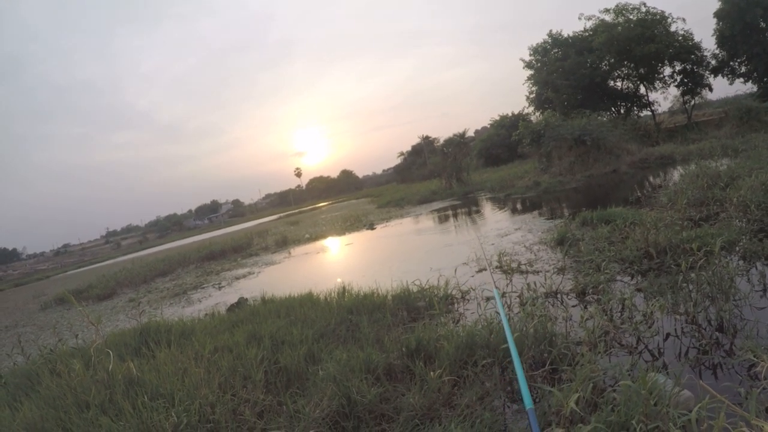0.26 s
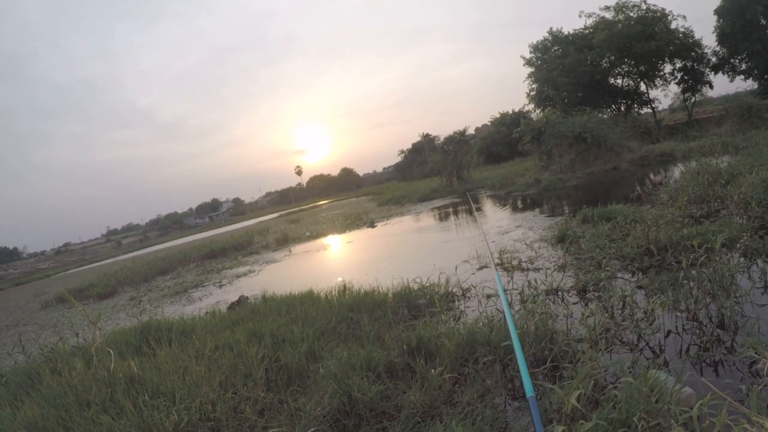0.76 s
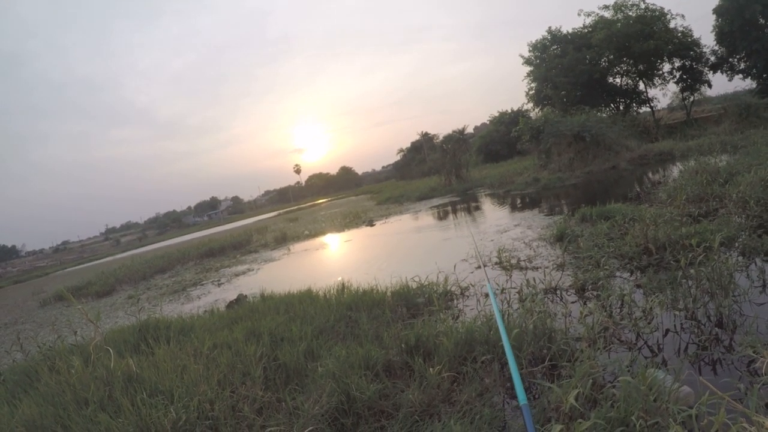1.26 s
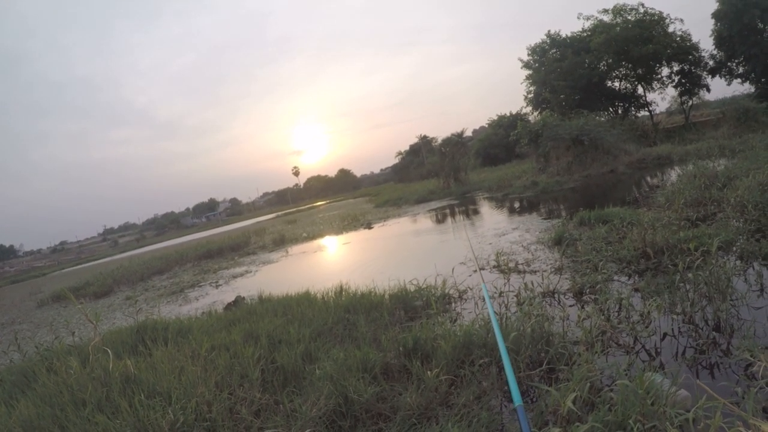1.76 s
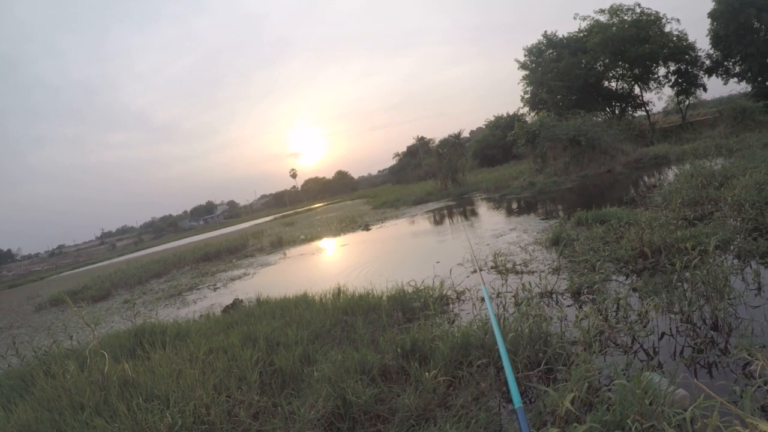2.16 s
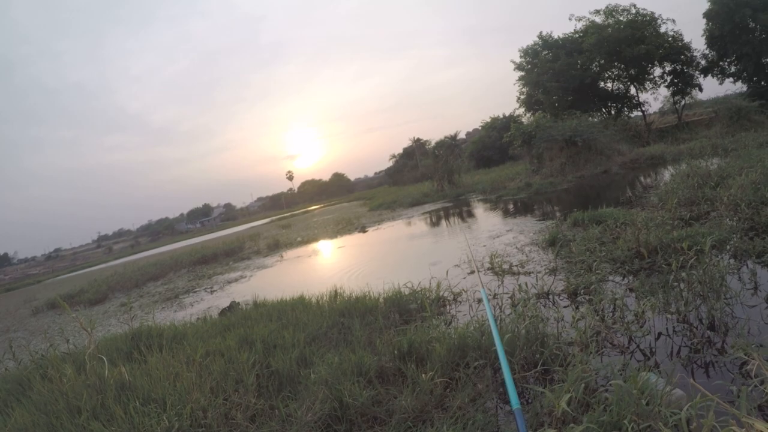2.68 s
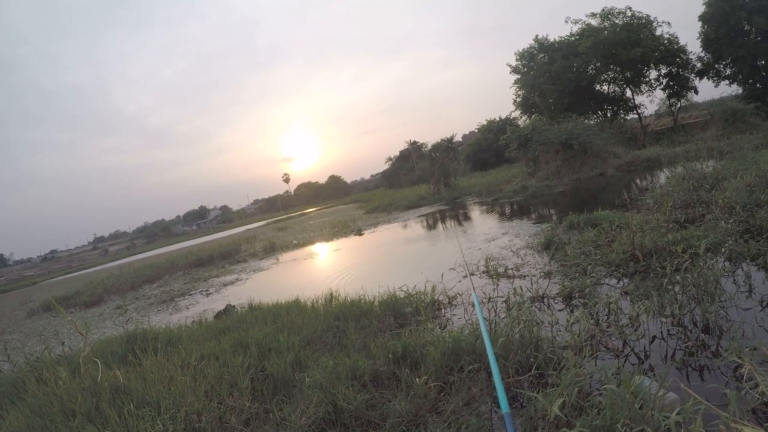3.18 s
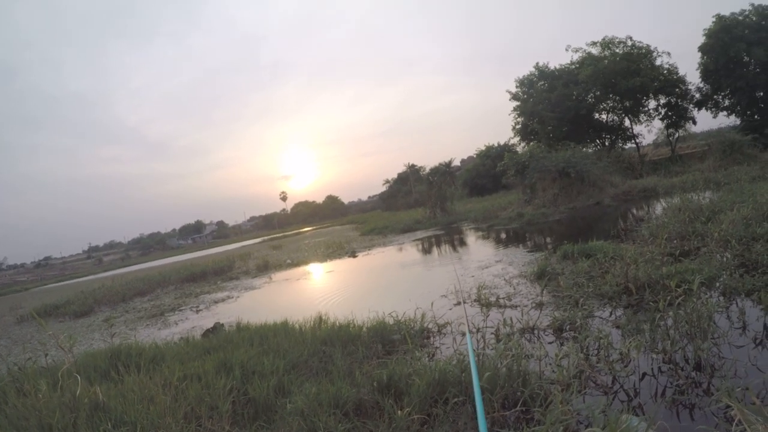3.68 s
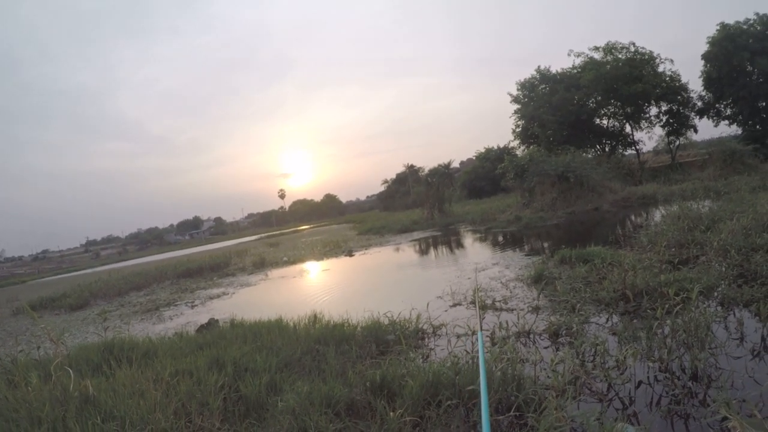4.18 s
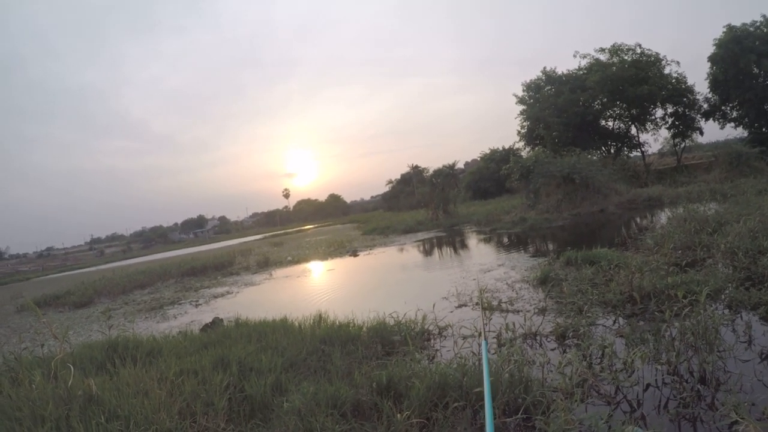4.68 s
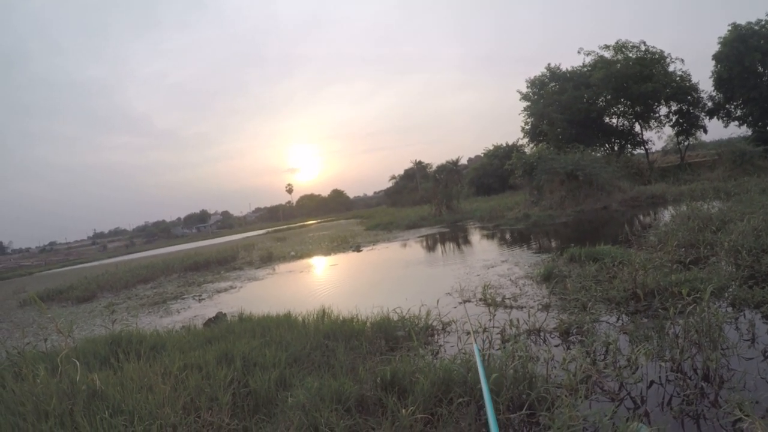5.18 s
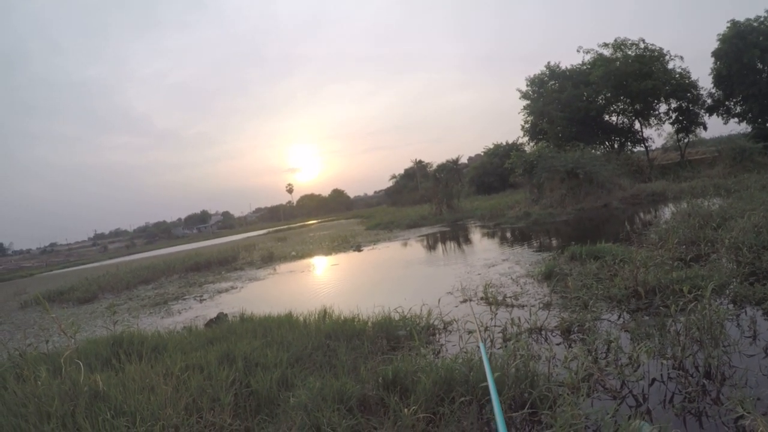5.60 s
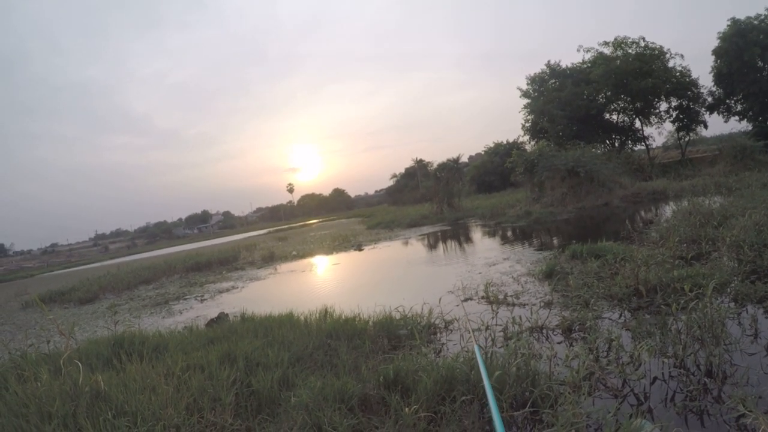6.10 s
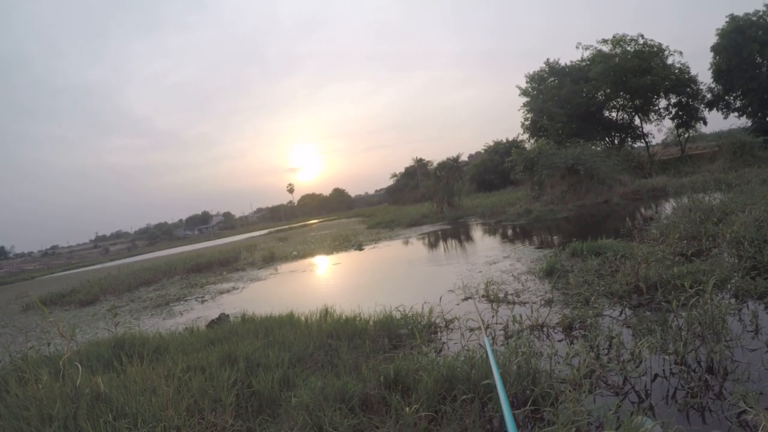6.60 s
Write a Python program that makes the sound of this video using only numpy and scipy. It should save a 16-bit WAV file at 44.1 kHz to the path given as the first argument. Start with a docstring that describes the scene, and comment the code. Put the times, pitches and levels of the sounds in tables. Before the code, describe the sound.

Throughout about seven seconds, crickets near the microphone rasp in quick, regular pulses, very high and steady, blurred by farther crickets and thin insect drones. Beneath is a deep rumble with uneven gusts, a soft low-mid flutter and an open-air wash. At 0.0, 0.3 and 0.6 s a mid-pitched bird whistle arches up and falls, while small birds slur and twitter thickly until about 1 s, thinning towards 2.4 s. A buzzing insect trill starts near 1.3 s, peaks around 2-2.3 s, then drops away by 3 s; a faint low hum sits beneath it. From 3.3 s, quick rising chips come irregularly, with repeated two-part chirps from 3.7 to 4.4 s. A small dry tick falls at 4.7 s, followed by a soft blip. Sparse chips, ticking bird notes and faint buzzes continue, with soft slurs near 6.5 s. Muffled hollow plops are scattered throughout.

```python
"""Crickets rasp steadily beside a marshy pond at dusk, each wing stroke a quick falling sine.
Pulsed and scraped resonances make an insect's long trill and shorter buzzes; narrow noise makes thin drones.
Gliding sines make three bird whistles and the slurs, chips and twitter of small birds; a faint hum,
low blips, a noise tick and noise plops dot the scene. Below lie a gusty noise rumble, a low-mid flutter
and an open-air wash, all heard through two closely spaced microphone ports."""
import sys
import numpy as np
from scipy import signal
from scipy.fft import rfft, irfft
from scipy.io import wavfile
from scipy.ndimage import uniform_filter1d

SR = 44100
rng = np.random.default_rng(int(sys.argv[2]) if len(sys.argv) > 2 else 0)


def persist_wave(psi):
    """Save psi, clipped to +-1, as 16-bit WAV."""
    counts = np.round(np.clip(psi, -1, 1) * 32767).astype(np.int16)
    wavfile.write(sys.argv[1], SR, np.atleast_2d(counts).T)


N = 302085
TIME = np.arange(N) / SR

# Near crickets that chirp in step. Each row: delay after the common beat in seconds, nominal top pitch in Hz,
# relative level in dB, left-port lag in ms.
NEAR_CRICKETS = [(0, 8300, 0, .045), (.007, 8350, -3, .045), (.012, 8200, -9, .04)]
# Colour of a cricket's wings. Each row: frequency in Hz, relative level in dB.
WING_COLOUR = [(5700, -33), (6150, -10), (6450, -6), (7000, -2.5), (7500, -0.5), (7900, -1), (8150, -7),
               (8500, -11), (9000, -31), (9600, -38.5)]
# Colour of the crickets at the left port only. Each row: frequency in Hz, gain in dB.
LEFT_PORT_COLOUR = [(5700, 17.5), (6500, -4), (7300, -0.5), (7800, -4.5), (8200, -18), (9000, -1.5)]
# Slow swell of the whole chorus. Each row: time in seconds, gain in dB.
CHORUS_SWELL = [(0, 0.9), (.6, 0), (1.55, 1.3), (2, 0), (2.75, 0.1), (3.5, .5), (4.7, .6), (5.3, 0),
                (6.85, 0)]
CHIRPS_PER_S = 17.85
CHORUS_DB, FAR_CRICKETS_DB = -35.5, -1  # chorus before its slow swell; far crickets against near

# Steady thin insect tones. Each row: centre in Hz, nominal width in Hz, level in dB.
DRONES = [(7046, 50, -52), (7850, 65, -51)]
# Single insect buzzes. Each row: start in seconds, end in seconds, centre in Hz, nominal width in Hz,
# strokes per second, level in dB.
BUZZES = [(0.037, 0.132, 5300, 1100, 100, -48), (.38, 0.518, 4950, 700, 110, -55),
          (0.798, 1.119, 5280, 850, 100, -49.5), (3.372, 3.43, 4200, 1500, 45, -53),
          (4.01, 4.18, 3620, 90, 88, -56), (4.372, 4.452, 3460, 130, 140, -52),
          (5.353, 5.554, 3420, 160, 110, -58), (5.822, 5.92, 3530, 130, 89, -58),
          (6.51, 6.605, 3400, 300, 140, -57)]
# A far insect that buzzes at an even pace.
PACED_FIRST_S, PACED_EVERY_S, PACED_LENGTH_S = 3.34, .543, .2
PACED_HZ, PACED_WIDTH_HZ, PACED_STROKES_PER_S, PACED_DB = 4900, 260, 50, -59.5
BUZZ_SCRAPE, STROKE_JITTER = .55, .035  # noise share of the power; timing spread in stroke periods

# Swell of the long trill, used relative to its loudest point. Each row: time in seconds, level in dB.
TRILL_SWELL = [(1.27, -66), (1.295, -50), (1.41, -50), (1.45, -47), (1.57, -50), (1.6, -47), (1.63, -44),
               (1.9, -42.5), (1.95, -40), (2.28, -41), (2.31, -48.5), (2.6, -51), (2.78, -55), (2.92, -50),
               (2.98, -62)]
# Wandering pitch of the trill. Each row: time in seconds, pitch in Hz.
TRILL_PITCH = [(1.27, 5680), (1.45, 5610), (1.58, 5560), (1.7, 5690), (1.82, 5580), (1.9, 5620),
               (2.1, 5590), (2.25, 5615), (2.36, 5690), (2.95, 5630)]
# Resonances of the trill. Each row: centre in Hz, nominal width in Hz, level at full swell in dB,
# dB gained per dB of swell, share of scraping noise from 0 to 1.
TRILL_BANDS = [(5640, 190, -46.3, 1.2, .55), (5720, 400, -52.5, .45, .6), (4960, 170, -59, .1, .6),
               (4620, 130, -62, .8, .3), (4300, 1000, -55, .7, .85)]
TRILL_STROKES_PER_S, TRILL_WAVER_HZ = 122, 18
CORE_DB, CORE_FOLLOW = -48.5, 1.1  # central tone at full swell; dB gained per dB of swell

# Shape of one whistled call. Each row: time from its start in seconds, pitch in Hz, relative level in dB.
WHISTLE_SHAPE = [(0, 1415, -6), (.015, 1444, -3), (.06, 1482, -5.5), (.085, 1600, 5), (.103, 1590, 0),
                 (.115, 1474, -5), (.15, 1354, 3.5), (.18, 1226, -5), (.215, 1100, -12)]
# The calls. Each row: start in seconds, gain on the call's shape in dB.
WHISTLES = [(.012, -43), (0.289, -42.5), (0.575, -43)]

# Small birds' slurred notes. Each row: start in seconds, length in seconds, start pitch in Hz, end pitch in Hz,
# sag below a straight glide in Hz, level before the trim of all slurs in dB, swell in mid-note in dB.
SLURS = [(0.138, 0.045, 6150, 4150, 253, -45.5, -3), (.128, 0.081, 4000, 3200, -3, -53.5, 0),
         (.195, 0.012, 4570, 5900, 0, -48, 5), (0.293, 0.023, 5630, 5600, -6, -55, 4),
         (0.352, 0.15, 5970, 3900, 483, -55.5, 2), (0.477, 0.066, 4680, 4030, -3, -54, 3),
         (.522, 0.052, 6080, 4180, 396, -48, -2), (0.547, 0.083, 3770, 3130, 1, -51.5, 2),
         (0.622, .018, 5550, 6300, 1, -44, 1), (0.656, 0.14, 6550, 3390, 879, -44, -7.5),
         (0.816, 0.026, 6050, 5450, 148, -47, 1), (.822, 0.054, 4800, 4200, 55, -56, 2),
         (0.887, 0.027, 4100, 4040, 97, -48, 1), (0.932, 0.086, 4680, 4510, 120, -50.5, 5),
         (1.053, .14, 4520, 3200, -1, -48.5, -2.5), (1.216, 0.075, 4920, 4900, -1, -52.5, 7),
         (1.27, 0.13, 4680, 4450, -0.5, -54, -1), (1.455, 0.03, 4370, 3850, -2, -53, 3),
         (1.505, 0.066, 4320, 4930, 0, -50, -1), (1.578, 0.055, 3620, 3090, 0, -51, -2),
         (1.589, 0.17, 4130, 3210, -63, -54, 1), (1.786, 0.036, 3570, 3170, -2, -59, 8),
         (1.859, 0.023, 3650, 4020, 1, -49, 1), (1.956, .032, 3370, 3130, 5, -48.5, 1),
         (2.137, 0.017, 3680, 3060, 81, -47, -2), (2.218, .11, 3590, 3600, 38, -55, -7),
         (2.365, 0.069, 3380, 3200, -5, -53, -8.5), (3.29, .035, 6200, 5600, 79, -55, 2),
         (3.668, 0.024, 4100, 4200, 1, -63, -2), (4.565, .04, 6200, 5600, 50, -57, -2),
         (4.645, 0.041, 6250, 5500, 200, -59, 0), (5.652, 0.04, 6250, 5700, 53, -62, -1),
         (6.455, 0.11, 4130, 4090, -19, -52.5, -4), (6.61, 0.1, 3660, 3630, 3, -55.5, -3),
         (6.76, 0.039, 3740, 3860, 0, -59, 0), (6.808, .04, 4480, 4100, 0, -59, -2)]
SLURS_TRIM_DB, SLUR_EDGE_S, SLUR_ROUGH = -1.6, 0.0028, .5
PLUNGE = 4.5  # higher values make the pitch sag earlier in a slur
# Quick rising chips. Each row: start in seconds, length in seconds, top pitch in Hz, climb in Hz,
# level at the top in dB.
CHIPS = [(3.317, .014, 4420, 450, -48), (3.468, 0.012, 5650, 750, -46.5), (3.787, 0.011, 5730, 500, -49),
         (3.928, 0.014, 4350, 450, -44.5), (4.170, .01, 5630, 450, -48), (4.252, 0.02, 4300, 800, -48.5),
         (4.511, 0.025, 4350, 1290, -45), (4.533, .011, 5700, 600, -48), (4.829, 0.02, 4300, 450, -50.5),
         (4.938, 0.014, 5750, 604, -48), (5.225, .02, 3940, 710, -49.5), (5.595, 0.021, 4020, 750, -47),
         (5.974, 0.02, 4030, 895, -47), (6.298, 0.029, 4050, 604, -50), (6.375, 0.017, 4200, 250, -51),
         (6.724, 0.013, 3880, 600, -47)]
CHIP_START_BOOST_DB = 2  # a chip starts this much above its level at the top
FLICK_AFTER_S, FLICK_S, FLICK_FALL, FLICK_DB = 0.03, 0.028, 0.16, -8  # fall is a share of the top pitch
# Pairs of steep falling sweeps. Each row: start in seconds, level of the first sweep in dB.
TSIKS = [(5.403, -53), (5.906, -53), (6.396, -51)]
TSIK_HZ, TSIK_FALL_HZ, TSIK_S, TSIK_GAP_S, TSIK_SECOND_DB = 6000, 2050, 0.016, 0.014, -3
# Faint twitter. Each row: start in seconds, end in seconds, notes per second, level in dB.
TWITTER = [(.05, 1, 40, -59), (1.2, 2.5, 20, -60), (3.3, 4.6, 6, -60)]
TWITTER_LOW_HZ, TWITTER_HIGH_HZ = 3390, 5610  # range of the mid-note pitch
TWITTER_S, TWITTER_GLIDE = 0.0293, 0.082  # mean length; share of its pitch that a note glides
# Two-part notes, a whip down and a short rise. Each row: start in seconds, level in dB.
COUPLETS = [(3.722, -61), (3.859, -56), (3.995, -51), (4.134, -47), (4.269, -50), (4.406, -50)]
WHIP_HZ, WHIP_S = (5100, 3670), 0.024  # from, to; length
RISE_HZ, RISE_S, RISE_AFTER_S = (4230, 4400), .032, 0.021  # from, to; length; start after the whip
NOTE_FLUTTER_DB, NOTE_WAVER_HZ = 3, 48  # unevenness of a note at roughness 1

# Soft low plops. Each row: time of the crest in seconds, centre in Hz, level in dB.
PLOPS = [(.245, 506, -35.5), (.42, 557, -40.5), (.52, 605, -39), (1.23, 580, -35), (1.73, 490, -37),
         (2.08, 527, -38), (2.6, 650, -38), (2.73, 530, -37.5), (3.32, 550, -40), (3.59, 610, -40),
         (4.21, 570, -39), (5.18, 560, -40), (6.3, 523, -35), (6.54, 560, -39.5)]
PLOP_HALF_S, PLOP_WIDTH_HZ, PLOP_LEAN_DB, PLOP_LAG_MS = .024, 110, -6.5, -0.61
# Soft low blips. Each row: start in seconds, length in seconds, pitch in Hz, level in dB.
BLIPS = [(.527, .012, 2050, -52), (4.735, .014, 2130, -49)]
# Dry ticks. Each row: start in seconds, centre in Hz, nominal width in Hz, level at the onset in dB.
TICKS = [(4.664, 3600, 2200, -40)]
# One faint hum: start in seconds, end in seconds, pitch in Hz, level in dB.
HUM = (1.75, 2.48, 350, -50)

# Spectrum of the rumble. Each row: frequency in Hz, relative density in dB per Hz.
RUMBLE = [(8, -36.5), (15, -13), (22, 4), (35, -2), (50, 3), (62, -1.5), (80, -2.5), (100, -4),
          (150, -10.5), (200, -15), (260, -23), (330, -30.5), (420, -39), (700, -76.5)]
# Gusts in the bass of the rumble. Each row: time in seconds, gain in dB.
GUSTS = [(0, -5), (.28, 5), (.47, -1.5), (.63, 4.5), (.85, -1.5), (1.15, 1), (1.31, -4), (1.47, 2.5),
         (1.7, 0.5), (2, 1.5), (2.2, -1), (2.62, -4), (2.93, 2.5), (3.25, 1.8), (3.6, -2), (3.97, 2),
         (4.48, -2.5), (5.05, 1), (5.4, 1.5), (5.55, 0), (5.85, .5), (6.3, -1.5), (6.5, -4), (6.72, 0)]
RUMBLE_DB, GUST_BELOW_HZ = -21.5, 128
LUMP_DB, LUMPS_PER_S = 0.5, 25  # quick random lumps over the whole rumble; their fastest rate
# Spectrum of the low-mid flutter. Each row: frequency in Hz, relative density in dB per Hz.
FLUTTER = [(120, -65), (240, -21), (340, -2.5), (520, 3), (620, 5.5), (800, -32), (1500, -91)]
FLUTTER_DB, FLUTTER_DEPTH_DB, FLUTTER_PER_S = -48.5, 4.5, 45
# Spectrum of the open air. Each row: frequency in Hz, relative density in dB per Hz.
AIR = [(200, -29), (330, -7), (480, 0.5), (620, 2), (760, 1), (1000, -4.5), (1300, -11.5), (1700, -16),
       (3000, -19.5), (3900, -20), (4500, -24), (5800, -19.5), (8500, -22), (9500, -41.5), (13000, -55.5)]
AIR_DB = -37.5

# Likeness of the background at the two ports. Each row: frequency in Hz, likeness from 0 to 1.
LIKENESS = [(30, 0.96), (200, 0.74), (320, 1), (550, 0.98), (800, 0.97), (1000, 0.72), (1250, 0.057),
            (1800, 0.42), (5000, 0.37), (12000, 0.18)]
# Balance of the background between the ports. Each row: frequency in Hz, left minus right in dB.
LEAN = [(20, 4), (50, -6), (100, -3), (200, -11), (300, -14.5), (420, -9), (550, -7), (750, -0.5),
        (1000, -3.5), (1300, 1.5), (2000, 2.5), (3000, 4), (4500, -5), (8000, 1)]
# Phase of the background between the ports. Each row: frequency in Hz, lead of the left port in radians.
LEAD = [(30, -.4), (130, -.35), (220, 0), (300, .6), (420, 1.9), (550, 2.5), (720, 2.7), (900, 2.9),
        (1250, 2.3), (1800, 1), (3000, .8), (4200, .2), (5000, -1)]
EDGE_HZ = 13400


def crickets(far_count=6):
    """Neighbours keep to one beat; the far ones each go their own pace and blur together."""
    beat = np.arange(-2, 140) / CHIRPS_PER_S
    near = np.zeros((2, N))
    for delay, top_hz, db, lag_ms in NEAR_CRICKETS:
        near += gain_of(db) * placed(cricket(beat + delay, top_hz), 0, lag_ms)
    near = scattered(evened(near), t60=.05, wet_db=-13)
    far = np.zeros((2, N))
    for _ in range(far_count):
        own_beat = beat * rng.uniform(.92, 1.1) - rng.random() / 10
        far += placed(cricket(own_beat, rng.uniform(8000, 8900)), 0, rng.uniform(.02, .07))
    far = evened(scattered(far, t60=.2, wet_db=-3))
    left, right = near + gain_of(FAR_CRICKETS_DB) * far
    chorus = evened(np.array([coloured(left, LEFT_PORT_COLOUR), right]))
    return gain_of(CHORUS_DB + np.interp(TIME, *np.transpose(CHORUS_SWELL))) * chorus


def cricket(chirps, top_hz, uneven_db=-0.5):
    """The scraper slows as it runs down the wing file, so a stroke is a falling tone; two make a chirp."""
    stroke_s, gap_s, fall_hz, wander_s, jitter_s = .0145, .0195, 2150, .0035, .0016
    u = progress(stroke_s)
    swell = signal.windows.tukey(len(u), .25)
    chirps = chirps + wander_s * drift(chirps, 3)
    out = np.zeros(N)
    for s in np.concatenate([chirps, chirps + gap_s]):
        late, size, sharp = rng.standard_normal(3)
        stroke = gain_of(uneven_db * size) * swell * tone(top_hz + 60 * sharp - fall_hz * u)
        if s > 0:
            add(out, s + jitter_s * late, stroke)
    return evened(coloured(out, WING_COLOUR))


def insects():
    """Steady thin drones and short spells of buzzing, with a long trill closer by."""
    far = sum(gain_of(db) * band(hz, width) for hz, width, db in DRONES)
    paced_starts = np.arange(PACED_FIRST_S, TIME[-1], PACED_EVERY_S)
    paced = sum(spell(start, start + PACED_LENGTH_S) for start in paced_starts)
    far = far + gain_of(PACED_DB) * paced * buzz(PACED_HZ, PACED_WIDTH_HZ, PACED_STROKES_PER_S)
    for start, end, hz, width, rate, db in BUZZES:
        far = far + gain_of(db) * spell(start, end) * buzz(hz, width, rate)
    near = scattered(placed(trill(), lean_db=-5, lag_ms=.035), t60=.05, wet_db=-14)
    return near + scattered(placed(far, lean_db=-5, lag_ms=.035), t60=.1, wet_db=-7)


def trill():
    """Fast strokes give a wandering comb of partials that, with scraping, rings the wings around a core tone."""
    s, level = np.transpose(TRILL_SWELL)
    swell_db = np.interp(TIME, s, level - level.max())
    pitch = np.interp(TIME, *np.transpose(TRILL_PITCH)) + TRILL_WAVER_HZ * drift(TIME, 60)
    # the comb leaves out its centre, which is the core tone
    comb = sum(tone(pitch + k * TRILL_STROKES_PER_S) for k in range(-14, 5) if k)
    out = gain_of(CORE_DB + CORE_FOLLOW * swell_db) * tone(pitch)
    for hz, width, db, follow, scrape in TRILL_BANDS:
        ring = np.sqrt(1 - scrape) * resonance(comb, hz, width) + np.sqrt(scrape) * band(hz, width)
        out = out + gain_of(db + follow * swell_db) * ring
    return out * spell(s[0], s[-1])


def buzz(hz, width, rate, scrape=BUZZ_SCRAPE):
    """Equal wing strokes at a slightly uneven pace, and a share of scraping noise, ring one resonance."""
    turns = TIME * rate
    turns = turns + STROKE_JITTER * np.interp(turns, np.arange(N), rng.standard_normal(N))
    strokes = evened(np.diff(np.floor(turns), prepend=np.floor(turns[0])))  # one click per whole turn
    return resonance(np.sqrt(1 - scrape) * strokes + np.sqrt(scrape) * rng.standard_normal(N), hz, width)


def whistler():
    """Three arched, pure whistles from across the water, each the same gliding sine."""
    s, hz, db = np.transpose(WHISTLE_SHAPE)
    t, out = np.arange(0, s[-1], 1 / SR), np.zeros(N)
    swell = gain_of(np.interp(t, s, db)) * signal.windows.tukey(len(t), .1)
    call = swell * tone(np.interp(t, s, hz))
    for start, level_db in WHISTLES:
        add(out, start, gain_of(level_db) * call)
    return scattered(placed(out, lean_db=2.5, lag_ms=.2), t60=.35, wet_db=-10)


def small_birds():
    """Slurs from close by; chips, tsiks and twitter from the bushes round the water, with a wetter tail."""
    near = scattered(placed(slurs(), lean_db=-6, lag_ms=.025), t60=.3, wet_db=-8)
    bushes = placed(chips() + tsiks() + twitter(), lean_db=-6, lag_ms=.025)
    return gain_of(SLURS_TRIM_DB) * near + scattered(bushes, t60=.3, wet_db=-3)


def slurs():
    """Thin whistles slide between two pitches; those with a large sag plunge first, then flatten."""
    out = np.zeros(N)
    for s, length, start_hz, end_hz, sag_hz, db, swell_db in SLURS:
        u = progress(length)
        sag = 1 - np.exp(-PLUNGE * u) - u
        hz = start_hz + (end_hz - start_hz) * u - sag_hz * sag / sag.max()
        add(out, s, note(hz, db + swell_db * np.sin(np.pi * u) ** 2, SLUR_EDGE_S, SLUR_ROUGH))
    return out


def chips():
    """Each chip eases in level as it shoots up to its top pitch; a soft falling flick follows."""
    out = np.zeros(N)
    for s, length, top_hz, climb_hz, db in CHIPS:
        to_go = 1 - progress(length)
        rise_hz = top_hz - climb_hz * to_go ** 1.4
        add(out, s, note(rise_hz, db + CHIP_START_BOOST_DB * to_go ** 2, length / 4))
        flick_hz = top_hz * (1 - FLICK_FALL * progress(FLICK_S))
        add(out, s + FLICK_AFTER_S, note(flick_hz, db + FLICK_DB, FLICK_S / 2))
    return out


def tsiks():
    """Thin pairs of sweeps so steep that they sound like ticks."""
    out, hz = np.zeros(N), TSIK_HZ - TSIK_FALL_HZ * progress(TSIK_S)
    for s, db in TSIKS:
        add(out, s, note(hz, db, TSIK_S / 4))
        add(out, s + TSIK_GAP_S, note(hz, db + TSIK_SECOND_DB, TSIK_S / 4))
    return out


def twitter():
    """Faint short notes at loose intervals, gliding up or down, more of them low than high."""
    out = np.zeros(N)
    for start, end, rate, db in TWITTER:
        for s in np.arange(start, end, 1 / rate):
            late, pitch, length, glide = rng.random(4)
            u = progress(TWITTER_S * (.5 + length))
            middle_hz = TWITTER_LOW_HZ * (TWITTER_HIGH_HZ / TWITTER_LOW_HZ) ** (pitch ** 2)
            hz = middle_hz * (1 + TWITTER_GLIDE * np.sign(glide - .5) * (u - .5))
            add(out, s + late / rate, note(hz, db, TWITTER_S / 2))
    return out


def couplets():
    """A bird on another side of the pond repeats two gliding sines, a whip down and a short rise."""
    out = np.zeros(N)
    for s, db in COUPLETS:
        add(out, s, note(np.interp(progress(WHIP_S), [0, 1], WHIP_HZ), db, WHIP_S / 4))
        add(out, s + RISE_AFTER_S, note(np.interp(progress(RISE_S), [0, 1], RISE_HZ), db, RISE_S / 4))
    return scattered(placed(out, lean_db=-3, lag_ms=-.082), t60=.3, wet_db=-9)


def blips():
    """Soft, short, low sine notes, louder on the left."""
    out = np.zeros(N)
    for s, length, hz, db in BLIPS:
        add(out, s, note(np.full(int(length * SR), hz), db, length / 2))
    return placed(out, lean_db=8, lag_ms=-.075)


def ticks():
    """Brief dry ticks close by: band noise that starts at once and dies away exponentially."""
    out, t = np.zeros(N), np.arange(SR // 20) / SR
    decay_s = .003
    for s, hz, width, db in TICKS:
        add(out, s, gain_of(db) * band(hz, width)[:len(t)] * np.exp(-t / decay_s))
    return placed(out, lean_db=-2, lag_ms=0)


def plops():
    """Short, hollow, far-off puffs of band noise under a bell-shaped swell, earlier but softer on the left."""
    t = np.arange(-3 * PLOP_HALF_S, 3 * PLOP_HALF_S, 1 / SR)
    out, swell = np.zeros(N), np.exp(-(t / PLOP_HALF_S) ** 2)
    for s, hz, db in PLOPS:
        puff = evened(band(hz, PLOP_WIDTH_HZ)[:len(t)] * swell)
        add(out, s + t[0], gain_of(db) * puff * np.sqrt(np.mean(swell ** 2)))
    return placed(out, PLOP_LEAN_DB, PLOP_LAG_MS)


def hum():
    """A faint distant sine, wavering slightly in pitch, fades in and out once."""
    start, end, hz, db = HUM
    wavering = tone(hz + 2 * drift(TIME, 10))
    return placed(gain_of(db) * spell(start, end) * wavering, lean_db=-8, lag_ms=-.7)


def background():
    """Shaped noise: a rumble with gusty bass and quick lumps, a flutter above it, and the open-air wash."""
    rumble = at_ports(RUMBLE, swell_db=0.76)
    rumble = rumble / rumble.mean(0).std()
    bass = irfft(rfft(rumble) / (1 + (np.fft.rfftfreq(N, 1 / SR) / GUST_BELOW_HZ) ** 6), N)
    # level out the bass, then let the gusts shape it
    power = uniform_filter1d((bass ** 2).mean(0), size=SR // 4)
    gust_db = np.interp(TIME, *np.transpose(GUSTS))
    rumble = rumble - bass + bass * np.sqrt(power.mean() / power) * gain_of(gust_db)
    lumps_db = LUMP_DB * drift(TIME, LUMPS_PER_S)
    flutter = at_ports(FLUTTER, swell_db=-3.7) * gain_of(FLUTTER_DEPTH_DB * drift(TIME, FLUTTER_PER_S))
    air = at_ports(AIR, swell_db=0.46)
    low = gain_of(RUMBLE_DB + lumps_db) * rumble
    return low + gain_of(FLUTTER_DB) * evened(flutter) + gain_of(AIR_DB) * evened(air)


def at_ports(spectrum, swell_db):
    """Noise of a given spectrum as the two ports hear it, slowly swelling."""
    hz = np.fft.rfftfreq(N, 1 / SR)
    a, b = rfft(rng.standard_normal((2, N)))
    same, lean = np.clip(read(LIKENESS, hz), 0, 1), gain_of(read(LEAN, hz) / 2)
    left = (same * a + np.sqrt(1 - same ** 2) * b) * np.exp(1j * read(LEAD, hz))
    pair = irfft(np.array([left * lean, a / lean]) * gain_of(read(spectrum, hz)), N)
    return pair * gain_of(swell_db * drift(TIME, 3.9))


def placed(x, lean_db, lag_ms):
    """Direction: the left port hears the source lean_db louder and lag_ms later than the right."""
    late = irfft(rfft(x) * np.exp(-2j * np.pi * np.fft.rfftfreq(N, 1 / SR) * lag_ms / 10 ** 3), N)
    return np.array([late * gain_of(lean_db / 2), x * gain_of(-lean_db / 2)])


def scattered(x, t60, wet_db):
    """Grass and bushes return a short diffuse tail, different at each port."""
    t = np.arange(SR // 2) / SR
    taps = rng.standard_normal((2, len(t))) * 1000 ** (-t / t60) * (t > .002)
    taps /= np.linalg.norm(taps, axis=1, keepdims=True)
    return x + gain_of(wet_db) * signal.fftconvolve(x, taps, axes=1)[:, :N]


def note(hz, db, edge_s, rough=1):
    """A sine gliding along a pitch curve, uneven in level and pitch, with soft ends."""
    t = np.arange(len(hz)) / SR
    ends = signal.windows.tukey(len(t), 2 * edge_s / t[-1])
    flutter = evened(gain_of(rough * NOTE_FLUTTER_DB * drift(t, 300)))
    waver_hz = rough * NOTE_WAVER_HZ * drift(t, 400)
    return gain_of(db) * flutter * ends * tone(hz + waver_hz)


def tone(hz):
    """A sine of unit rms that follows a pitch curve."""
    return np.sqrt(2) * np.sin(2 * np.pi * (np.cumsum(hz) / SR + rng.random()))


def band(hz, width):
    """Noise ringing in one resonance."""
    return resonance(rng.standard_normal(N), hz, width)


def resonance(x, hz, width):
    """Passes one resonance; unit rms."""
    f = np.fft.rfftfreq(N, 1 / SR)
    return evened(irfft(rfft(x) / (1 + ((f - hz) / (0.87 * width)) ** 2), N))


def coloured(x, points):
    """Filters by a table of frequency in Hz and gain in dB."""
    return irfft(rfft(x) * gain_of(read(points, np.fft.rfftfreq(N, 1 / SR))), N)


def drift(t, rate):
    """Random wander of unit rms from ten sines, the fastest at the given rate in Hz."""
    speeds = np.geomspace(rate / 10, rate, 10)
    return evened(sum(np.sin(2 * np.pi * (f * t + rng.random())) / np.sqrt(f) for f in speeds))


def spell(start, end, edge_s=0.071):
    """Fades in, holds, then fades out."""
    return np.clip(np.minimum(TIME - start, end - TIME) / edge_s + .5, 0, 1)


def progress(length):
    """Runs from 0 to 1 over a note."""
    return np.linspace(0, 1, int(length * SR))


def read(points, hz):
    """A table's value on a log-frequency axis."""
    f, value = np.transpose(points)
    return np.interp(np.log(hz + 1), np.log(f + 1), value)


def gain_of(db):
    """Turns dB into an amplitude factor."""
    return 10 ** (np.asarray(db) / 20)


def evened(x):
    """Scales to unit rms."""
    return x / np.sqrt(np.mean(x ** 2) + 1e-20)


def add(mix, s, sound):
    """Mixes a sound in at a time in seconds."""
    part = mix[max(round(s * SR), 0):][:len(sound)]
    part += sound[:len(part)]


def scene():
    """Layers the pond from the crickets down to the rumble."""
    animals = crickets() + insects() + whistler() + small_birds() + couplets()
    return animals + blips() + ticks() + plops() + hum() + background()


def record(dry):
    """The microphones' upper band limit, a steep low-pass."""
    return signal.oaconvolve(dry, signal.firwin(511, EDGE_HZ, window=("kaiser", 9), fs=SR)[None], "same")


dry = scene()
out = record(dry)
persist_wave(out)
```